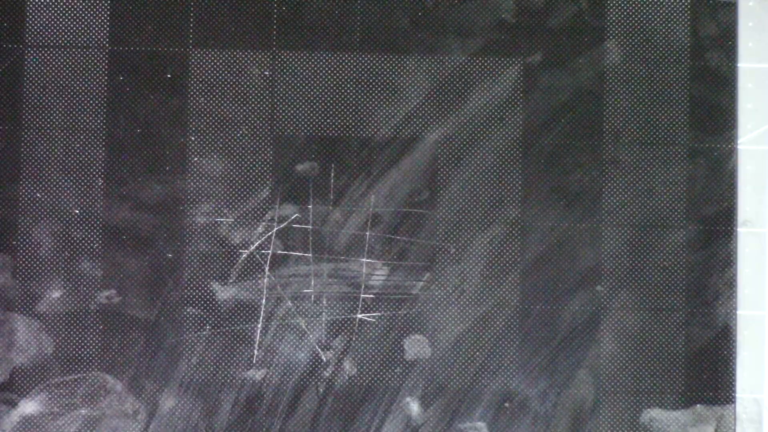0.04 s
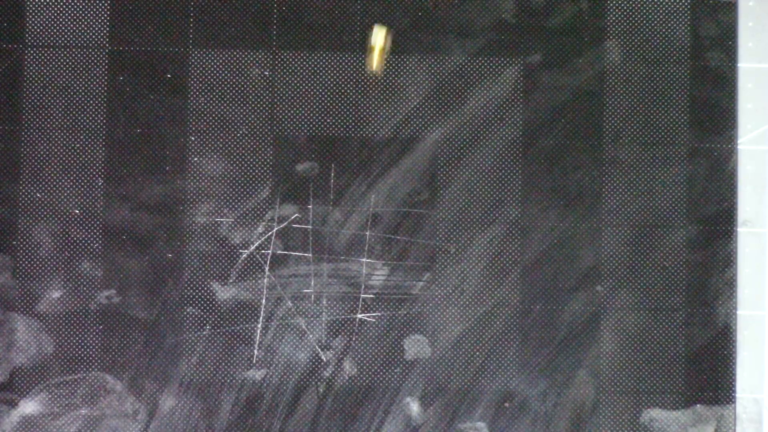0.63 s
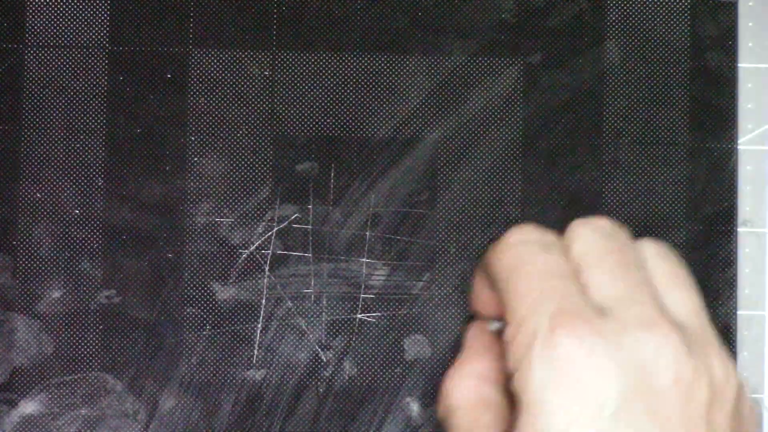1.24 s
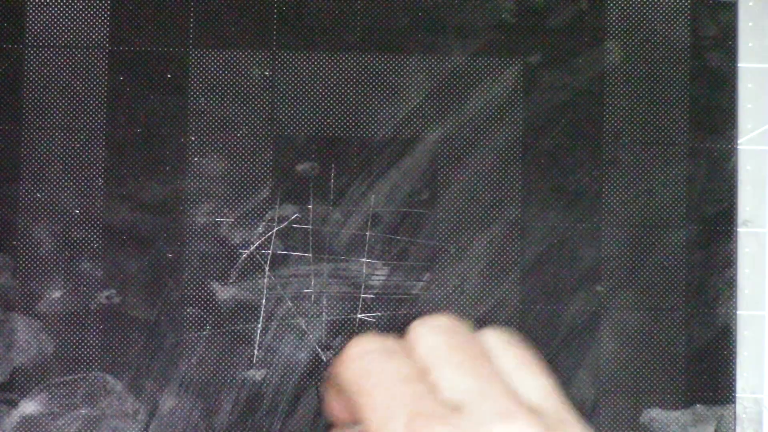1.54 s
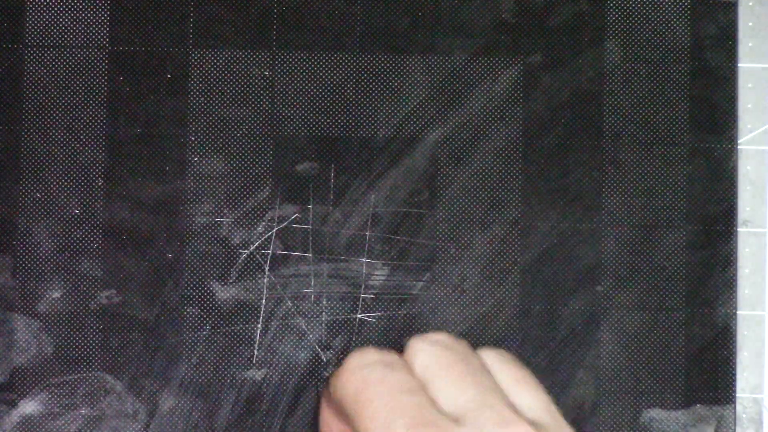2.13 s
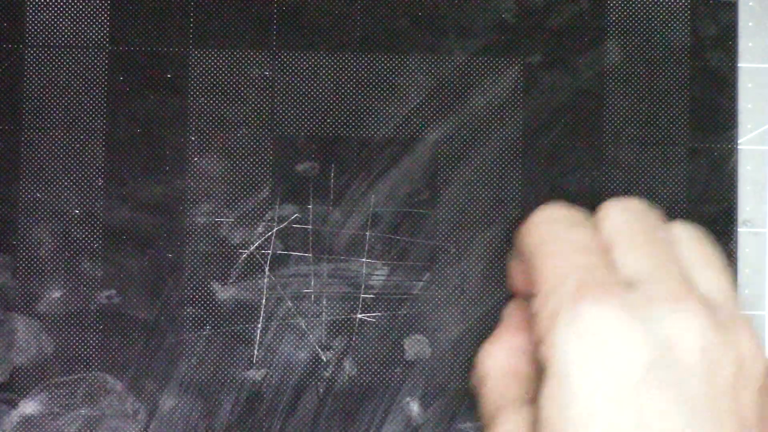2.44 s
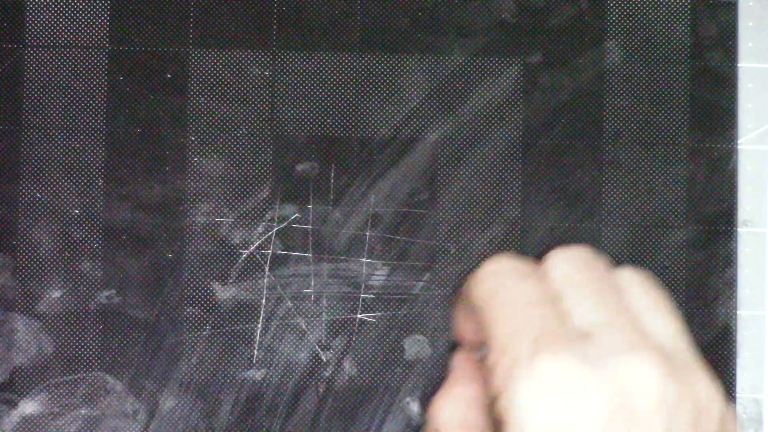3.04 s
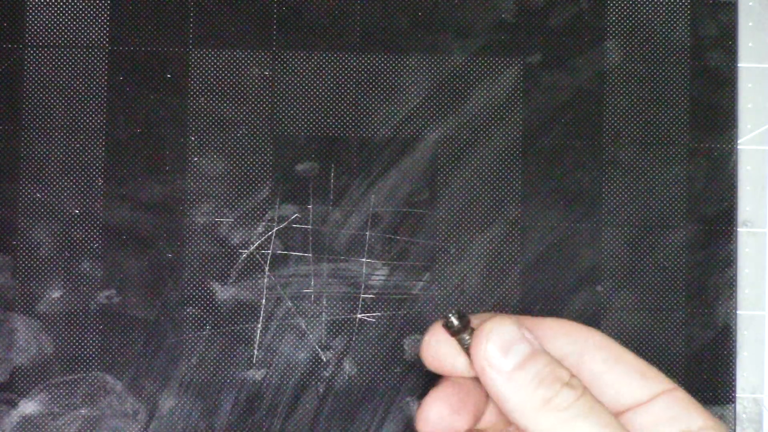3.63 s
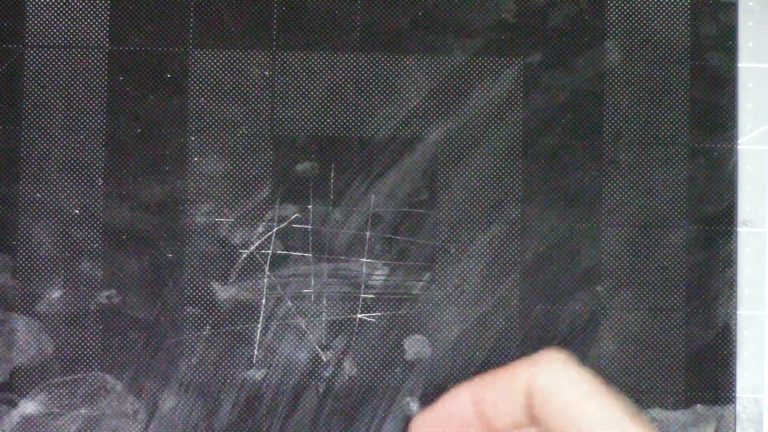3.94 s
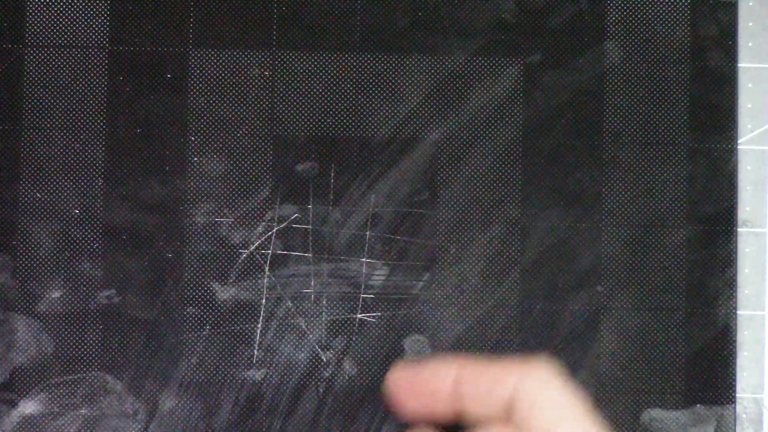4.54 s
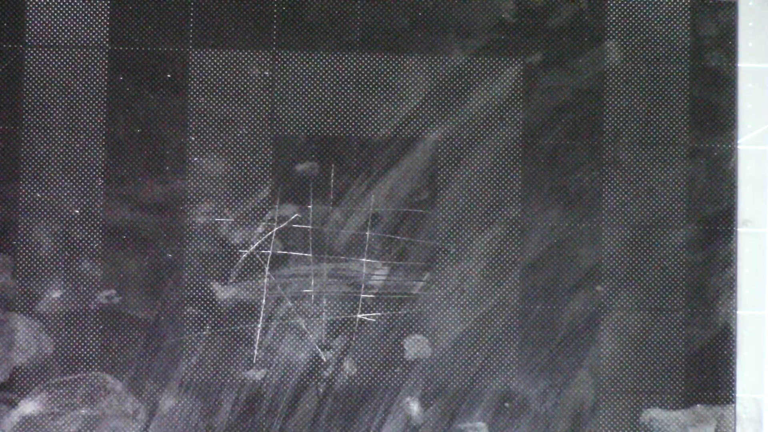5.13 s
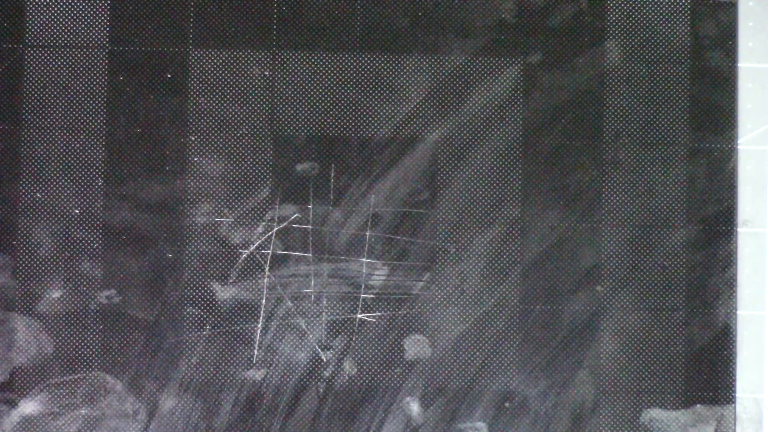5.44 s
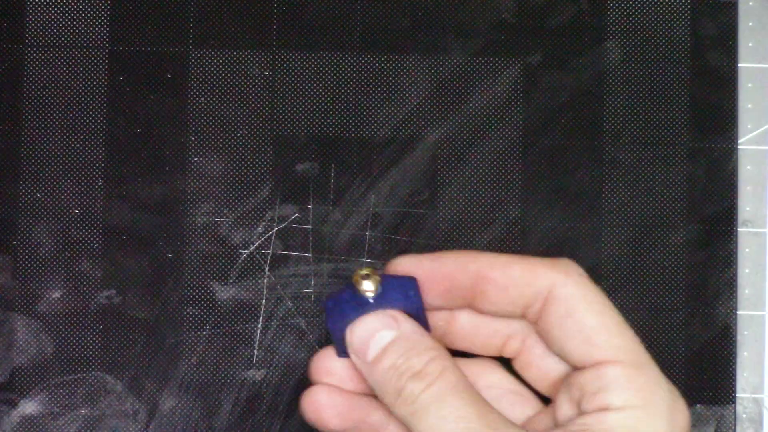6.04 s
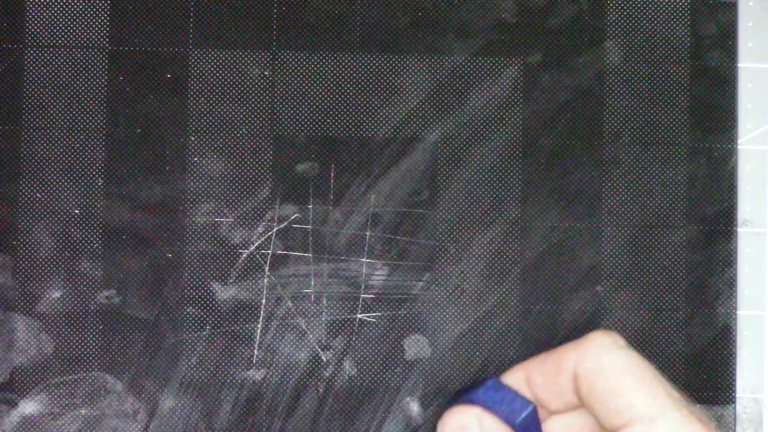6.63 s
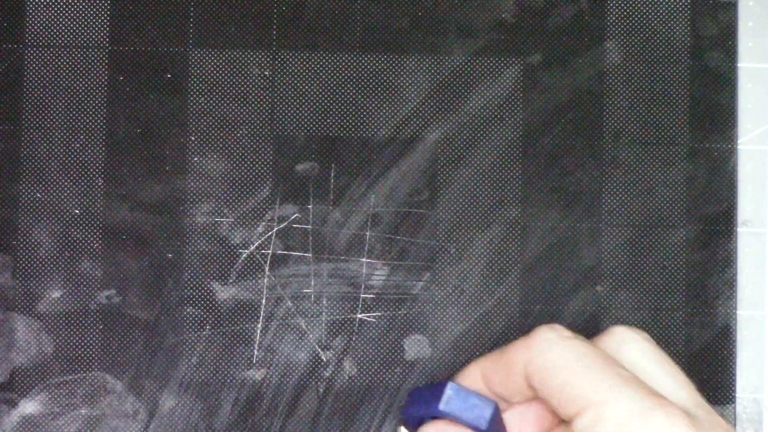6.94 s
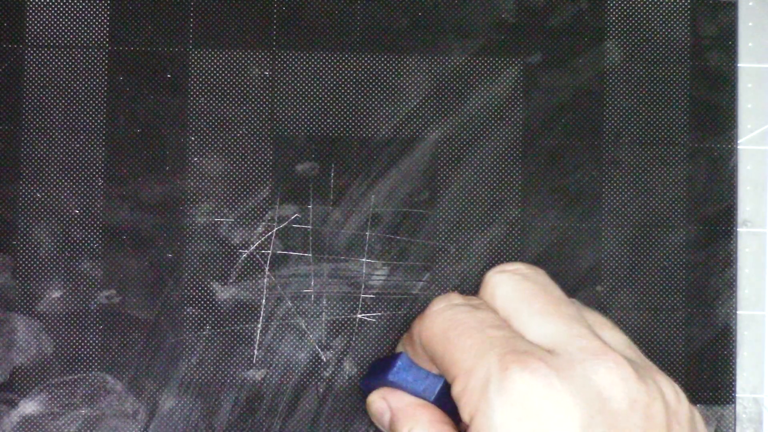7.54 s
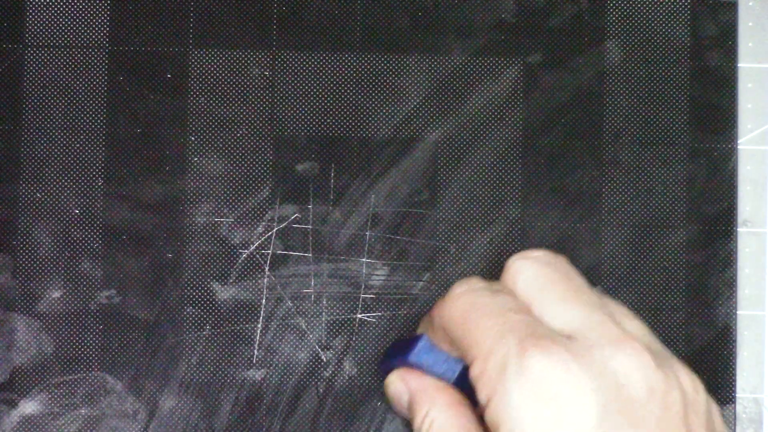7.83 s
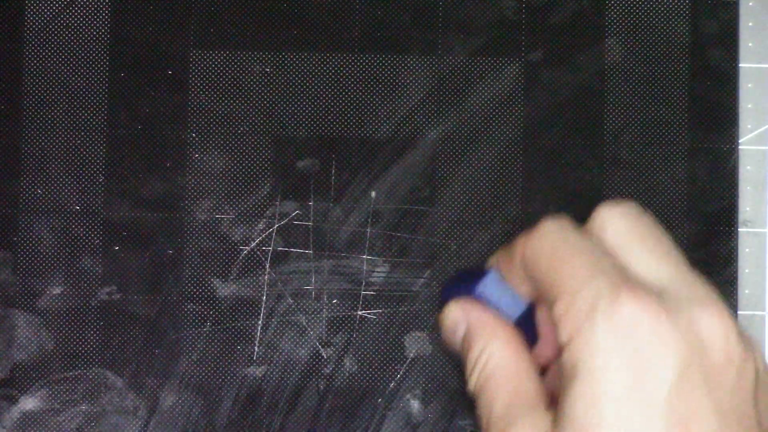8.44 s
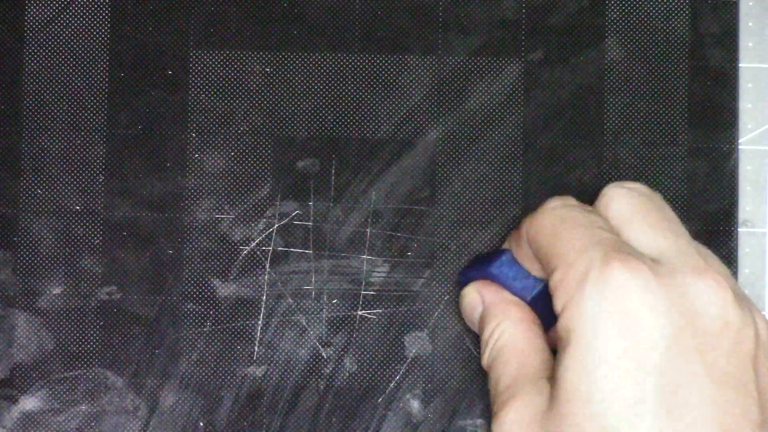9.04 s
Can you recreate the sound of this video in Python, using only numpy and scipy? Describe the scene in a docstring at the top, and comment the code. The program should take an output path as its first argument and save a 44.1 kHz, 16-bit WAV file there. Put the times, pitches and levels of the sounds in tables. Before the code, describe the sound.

A small metal nozzle bounces and rattles on a glass plate, then is stabbed down hard and scraped, with faint clicks in a quiet room.

```python
"""In a quiet room, printer nozzles are tried on a glass plate, close to a stereo microphone.
Twice a nozzle is dropped: each bounce makes the glass ring, and it rattles to rest. Five times one
is held, stabbed down hard and dragged, so that many tiny slips blur into a scrape; one stroke squeaks.
Hard blows overload the microphone. In between, small parts are picked up with faint clicks,
over a low rumble and hum."""
import sys
import numpy as np
from scipy import signal
from scipy.fft import rfft, irfft
from scipy.io import wavfile
from scipy.ndimage import uniform_filter1d

SR = 44100
rng = np.random.default_rng(int(sys.argv[2]) if len(sys.argv) > 2 else 0)


def materialize(psi):
    """Save the field psi as 16-bit PCM at rate SR to the path in sys.argv[1].

    A 1-D psi becomes a single channel; in a 2-D psi each row is a channel.
    """
    bounded = np.clip(np.atleast_2d(psi).T, -1, 1)
    quanta = np.round(bounded * 32767).astype(np.int16)
    wavfile.write(sys.argv[1], SR, quanta)


N = 409248
RING = np.arange(16384) / SR  # seconds through one blow
SLIDE = np.arange(1, 22051) / SR  # seconds through one scrape

# The nozzle is dropped, struck bare, struck in its holder, dragged lightly or pressed hard.
CONTACTS = ("loose", "bare", "block", "drag", "gouge")
# The glass plate's own tones, called modes. Each row: pitch in Hz, t60 (seconds to fade by 60 dB),
# left minus right in dB, then a level in dB for each of CONTACTS.
PLATE = [(182, 0.25, -3, -17, -21, -13, -6, -9), (525, 0.18, -4, -15, -22, -20, -13, -12),
         (600, 0.13, -5, -18, -20, -17, -5, -9), (785, 0.11, -2, -15, -17, -10, -4, -7),
         (900, 0.13, -1, -10, -23, -15, -4, -8), (1130, 0.1, -5, -14, -18, -12, -12, -15),
         (1470, 0.13, -3, -9, -15, -7, -11, -14), (1895, 0.15, -9, -6, -6, -2, 0, -3),
         (2047, 0.15, -3, -2, -5, 0, -9, -6), (2200, 0.1, 1, -5, -7, 0, -5, -4),
         (2455, 0.07, 0, -6, -5, -3, -11, -12), (2762, 0.11, 1, -1, 0, -4, -10, -5),
         (3040, 0.07, -1, -5, -10, -13, -18, -10), (3364, 0.17, -3, -3, -16, -10, -7, -2),
         (3635, 0.11, -6, -4, -7, -3, -15, -6), (3850, 0.06, -5, -10, -6, -10, -13, -11),
         (4215, 0.07, -4, -6, -7, -16, -15, -12), (4760, 0.08, -3, -6, -7, -12, -12, -13),
         (5072, 0.12, -5, -4, -14, -9, -8, -2), (6300, 0.08, -3, -9, -15, -20, -16, -8),
         (6850, 0.05, -2, -14, -11, -17, -20, -16), (7670, 0.11, -6, 0, -10, -12, -14, 0),
         (7860, 0.11, -1, -4, -10, -11, -16, -10), (8590, 0.07, 1, -8, -6, -19, -15, -4),
         (9175, 0.1, -5, -3, -15, -20, -18, -11), (9771, 0.11, 0, -4, -10, -21, -19, -11),
         (9969, 0.1, 2, -7, -9, -23, -20, -12), (10730, 0.09, -2, -5, -8, -17, -21, -12),
         (11195, 0.1, -3, -11, -17, -24, -20, -10), (11820, 0.09, -3, -9, -13, -22, -19, -13),
         (12393, 0.11, -1, -7, -17, -30, -25, -13), (13400, 0.09, 0, -13, -19, -31, -26, -13),
         (14392, 0.11, -5, -12, -17, -27, -31, -18)]
# A held nozzle striking or catching on the glass.
# Each row: start in seconds, level in dB, treble tilt in dB per octave, kind of contact.
STABS = [(0.9643, -23.5, -8, "block"), (0.9802, -27, -4, "drag"), (1.0004, -29, -3, "drag"),
         (1.0142, -27.5, -0.5, "drag"), (1.030, -37, -10.5, "drag"), (1.2924, -50, -0.5, "drag"),
         (1.5513, 0.5, 1.5, "bare"), (1.8146, -44, 2, "bare"), (2.2282, 1, 2, "bare"),
         (2.351, -43, 5, "bare"), (2.392, -36.5, 6, "bare"), (2.5027, -43, 1, "bare"),
         (2.631, -46.5, -9.5, "bare"), (2.9147, 1, 1, "bare"), (3.197, -33, 3.5, "bare"),
         (4.4592, -25, 11, "drag"), (4.513, -33, 0, "drag"), (4.5641, -29.5, 4, "drag"),
         (4.5842, -37.5, 4, "drag"), (7.1256, -39.5, -2, "block"), (7.1320, -34.5, -5, "block"),
         (7.1388, -26.5, -10, "block"), (7.351, -51, -6, "block"), (7.5723, -2.5, -3, "block"),
         (8.3827, -41.5, -1.5, "block"), (8.7460, -2, 1.5, "block"), (8.8536, -31.5, 7.5, "block"),
         (8.8990, -33, 2, "block"), (8.9060, -31, 2, "block")]


def glass(contact, crack_t60, ring_db, damping, valley_db, cluster_hz=130, spot_db=2,
          likeness=0.67, phase_spread=0.63):
    """One blow on the plate: a noisy crack, strongest near the main modes, which then ring on."""
    # The crack, a crowd of short-lived modes. Each row: frequency in Hz, level in dB.
    crack_colour = [(100, 0), (400, -6), (800, -2), (1400, 2.5), (2100, -0.5), (2900, 0), (4800, 2.5),
                    (7000, 2), (10000, -3), (13000, -0.5), (15500, -0.5), (18000, -13)]
    # How far the left microphone is ahead. Each row: frequency in Hz, phase in radians.
    left_lead = [(20, 0.3), (1500, -0.15), (2500, -0.67), (4500, -1.12), (8000, -2), (15000, -1.68)]
    f = bins(len(RING))
    hz, t60, pan_db, *levels = np.transpose(PLATE)
    # Each spot on the glass favours other modes.
    db = levels[CONTACTS.index(contact)] + spot_db * rng.standard_normal(len(hz))
    widths = cluster_hz * np.sqrt(hz / 3000)
    clusters = (amp(db) / (1 + ((f[:, None] - hz) / widths) ** 2)).max(1)
    valleys = amp(np.interp(f, hz, db) + valley_db)  # the floor between the modes
    crack_db = read(crack_colour, f) + 10 * np.log10(clusters ** 2 + valleys ** 2)
    crack = colour(burst(crack_t60, likeness), crack_db)
    left_gain = amp(np.interp(f, hz, pan_db) / 2) * np.exp(1j * read(left_lead, f))
    crack[0] = irfft(rfft(crack[0]) * left_gain)
    weights = amp(db) * np.exp(2j * np.pi * rng.random(len(hz))) / np.sqrt(t60 / t60.mean())
    lead = read(left_lead, hz) + phase_spread * rng.standard_normal(len(hz))
    sides = np.array([amp(pan_db / 2) * np.exp(1j * lead), amp(-pan_db / 2)])
    ring = (weights * sides @ modes(damping)).real
    fade = np.cos(np.pi / 2 * RING / RING[-1]) ** 2
    return (unit_attack(crack) + amp(ring_db) * ring) * fade


def modes(damping):
    """The plate's modes as fading tones; a damping of 2 makes them die twice as fast."""
    hz, t60 = np.transpose(PLATE)[:2]
    step = np.exp((2j * np.pi * hz - np.log(1000) * damping / t60) / SR)
    return np.cumprod(np.broadcast_to(step[:, None], (len(hz), len(RING))), axis=1)


def burst(t60, likeness):
    """Fading noise for a crowd of modes, about equally strong in every narrow band."""
    noise = pair(len(RING), likeness) * dying(t60)
    power = uniform_filter1d(abs(rfft(noise)) ** 2, size=40)
    return np.array([colour(side, -10 * np.log10(p / p.mean() + 1e-9)) for side, p in zip(noise, power)])


def bounces():
    """A dropped nozzle leaves the glass at once, so the plate rings freely."""
    # Each row is one bounce: start in seconds, level in dB, treble tilt in dB per octave.
    landings = [(0.363, 1, 2.5), (0.3708, -11, 2), (0.3982, -8, 2), (0.4236, -5.5, 1.5),
                (0.4476, -5.5, -2.5), (0.475, -8.5, -3.5), (0.4956, -5, 0), (0.513, -13, -1),
                (0.5448, -14, -4), (0.5617, -17, -4), (0.5902, -8.5, 0.5), (0.603, -16.5, -4),
                (0.6479, -6, -1), (0.6878, -13.5, -6), (0.7139, -12, -1), (0.7301, -13.5, -0.5),
                (0.7495, -14.5, -1.5), (0.8386, -39, -11), (0.8745, -26, -5), (0.9026, -22, -13),
                (0.9095, -23, -8), (4.2782, 3, 2.5), (4.3048, -0.5, 2.5), (4.3324, -6.5, -1.5),
                (4.3596, -3.5, -1), (4.3668, -3.5, 8.5), (4.386, -16.5, -2), (4.4, -19, 2),
                (4.4079, -3.5, -0.5), (4.4296, -14, 3.5)]
    out = np.zeros((2, N))
    for s, db, tilt_db in landings:
        blow = glass("loose", crack_t60=0.0235, ring_db=-15.5, damping=1.15, valley_db=-14.0,
                     cluster_hz=95, spot_db=2.6)
        add(out, s, amp(db) * unit_attack(tilted(blow, tilt_db)))
    return out * amp([[-.5], [.5]])


def stabs():
    """A held nozzle stays on the glass and chokes the ring."""
    # For each contact: level of the ring against the crack in dB, damping factor.
    choke = {"bare": (-15.5, 2.1), "block": (-15.5, 1.55), "drag": (-14.5, 1.9)}
    out = np.zeros((2, N))
    for s, db, tilt_db, contact in STABS:
        ring_db, damping = choke[contact]
        blow = glass(contact, crack_t60=0.0185, ring_db=ring_db, damping=damping, valley_db=-12,
                     cluster_hz=120, spot_db=1.5)
        add(out, s, amp(db) * unit_attack(tilted(blow, tilt_db)))
    return out * amp([[-.5], [.5]])


def friction(strokes, contact, slips_per_s, uneven_db, ring_db, bed_db, damping, valley_db):
    """Tiny slips of the tip ring the plate; each stroke sets how deep and how bright they sound."""
    out, size = np.zeros((2, N)), len(SLIDE)
    bands_hz = [(1500, 5500), (300, 1500), (5500, 15500), (90, 260)]  # middle, low, treble, bed
    spots = [glass(contact, crack_t60=0.027, ring_db=ring_db, damping=damping, valley_db=valley_db)
             for _ in range(6)]
    for start, middle, low, treble in strokes:
        scrape = 0
        for spot in spots:
            slipping = rng.random(size) < slips_per_s / len(spots) / SR
            strength = amp(uneven_db * np.minimum(rng.exponential(1, size), 3))
            slips = slipping * strength * rng.choice([-1, 1], size)
            scrape = scrape + signal.fftconvolve(slips[None], spot, axes=1)[:, :size]
        for band, db in zip(bands_hz, (middle, middle + low, middle + treble, middle + low + bed_db)):
            part = signal.sosfilt(signal.butter(3, band, "band", fs=SR, output="sos"), scrape)
            add(out, start, evened(part) * amp(db))
    return out


def stroke(length, db, sag_db_per_s, rise_s, release_db_per_s, touch_db=-25):
    """Level in dB of one slide: it rises from a light touch, drifts steadily, then is let go."""
    attack_db = touch_db * np.maximum(1 - SLIDE / rise_s, 0) ** 2
    sag_db = sag_db_per_s * np.minimum(SLIDE, length)
    release_db = release_db_per_s * np.maximum(SLIDE - length, 0)
    return db + attack_db - sag_db - release_db


def rolls():
    """The loose nozzle rolls and skids with an even tone until it runs down."""
    # Each row is one skid: start and length in seconds, middle band level in dB,
    # fall in dB per second, then low band and treble in dB against the middle.
    skids = [(0.69, .09, -21.5, 35, -10.5, -3), (0.871, .042, -31, 0, -9, -7),
             (0.935, 0.084, -44, 50, 1, -5), (4.44, .085, -38.5, 126.5, 1, -1)]
    strokes = [(start, stroke(length, db, sag, rise_s=0.0054, release_db_per_s=330), low, treble)
               for start, length, db, sag, low, treble in skids]
    return friction(strokes, "drag", slips_per_s=770, uneven_db=3, ring_db=-15.5, bed_db=-16,
                    damping=3, valley_db=-7)


def drags_and_ring(pull_after_s=.19, pull_width_s=0.046):
    """Four easing drags with one pull each; at 7.145 s, a brief dull ring after the holder touches."""
    # Each row: start and length in seconds, middle band level in dB,
    # fall in dB per second, then low band and treble in dB against the middle.
    after_landing = [(1.56, 0.29, -45.5, 20, -6, -5), (2.24, 0.33, -41.5, 60, -5, -4.5),
                     (2.925, 0.25, -41.5, 36, -7, -5), (7.145, .07, -46, 270, -1.5, -17),
                     (8.76, .30, -48, 12, -10.5, -2.5)]
    pull = np.exp(-((SLIDE - pull_after_s) / pull_width_s) ** 2)
    strokes = []
    for start, length, db, sag, low, treble in after_landing:
        level = stroke(length, db, sag, rise_s=.01, release_db_per_s=399.5)
        # The hand's pull makes the scrape louder and deeper.
        strokes.append((start, level + 5.5 * pull, low + 5 * pull, treble - 3.5 * pull))
    return friction(strokes, "drag", slips_per_s=1300, uneven_db=4.5, ring_db=-12, bed_db=-8,
                    damping=3.4, valley_db=-9)


def gouge(stop_s=0.081, thins_db=7, brightens_db=13):
    """The tip digs in and speeds up, sounding thinner and brighter as it goes, then stops."""
    # One long stroke: start and length in seconds, middle band level in dB,
    # fall in dB per second (negative, so it grows), low band and treble in dB against the middle.
    hard_stroke = (7.80, .305, -39, -6, -4, -7)
    start, length, db, sag, low, treble = hard_stroke
    speed = np.interp(SLIDE, [0, length, length + stop_s], [0, 1, 0])
    level = stroke(length, db, sag, rise_s=.08, release_db_per_s=280)
    strokes = [(start, level, low - thins_db * speed, treble + brightens_db * speed)]
    return friction(strokes, "gouge", slips_per_s=1500, uneven_db=3, ring_db=-8, bed_db=-5,
                    damping=3.7, valley_db=-4.5)


def squeak(start=8.085, length=0.055, hz=3382, db=-36, waver=0.0077):
    """At the end of the hard stroke the slips briefly lock on to one mode of the plate."""
    out, size = np.zeros((2, N)), round(length * SR)
    pitch = hz * (1 + waver * evened(uniform_filter1d(rng.standard_normal(size), size=200)))
    tone = np.sin(2 * np.pi * np.cumsum(pitch) / SR)
    add(out, start, amp(db) * tone * np.hanning(size) * amp([[-1], [1]]))
    return out


def thuds(jolt_db=-38):
    """The bed under the glass bobs on its mounts, moved by the hand and jolted by every stab."""
    # The hand settling on the bed or letting go. Each row: start in seconds, level in dB.
    touches = [(1.923, -46.5), (2.529, -48), (3.211, -46), (7.131, -38), (8.38, -36), (9.103, -41)]
    # Each row: pitch in Hz, t60 in seconds, level in dB.
    bed_modes = ((182, .3, 0), (122, .15, -8), (240, .1, -10), (100, .25, -10))
    bob = sum(amp(db) * dying(t60) * np.sin(2 * np.pi * hz * RING) for hz, t60, db in bed_modes)
    jolts = [(s, db + jolt_db) for s, db, *_ in STABS]
    out = np.zeros((2, N))
    for s, db in touches + jolts:
        add(out, s, amp(db) * bob * amp([[-1], [1]]))
    return out


def click(t60, tilt_db):
    """A light contact makes a brief burst of noise."""
    # The burst's tone. Each row: frequency in Hz, level in dB.
    click_colour = [(100, -7), (500, -1.5), (2000, 2), (3500, -3), (6000, -2), (12000, -2.5), (16000, -10)]
    noise = pair(len(RING), likeness=0.16) * dying(t60)
    return unit_attack(tilted(colour(noise, read(click_colour, bins(len(RING)))), tilt_db))


def small_sounds(middling_db=-46, room_share=.5):
    """Clicks, knocks and one short hiss: the direct sound, and what they send into the room."""
    # Clicks of small parts, and at 0.942 s a short bright hiss as the nozzle rolls.
    # Each row: start in seconds, level in dB, treble tilt in dB per octave.
    clicks_and_hiss = [(0.029, -45, -1.5), (0.191, -52, 3), (0.23, -46.5, -2), (0.942, -38, 4),
                       (1.107, -50, -11), (3.416, -52.5, -3), (3.675, -57, -1.5), (4.08, -41, 5),
                       (4.144, -49, -1), (4.648, -50, 5), (4.821, -43.5, 3), (5.204, -49.5, -2.5),
                       (5.2212, -37.5, 7.5), (5.320, -47.5, -2.5), (5.56, -41, -2.5), (5.892, -52, 0),
                       (6.111, -53, -6.5), (6.2522, -46.5, 0), (6.548, -48, -6), (6.633, -45, -2.5),
                       (6.823, -51, -9.5)]
    # Dull knocks of a plastic part. Each row: start in seconds, level in dB.
    knock_times = [(5.3588, -18.5), (5.3641, -24.5)]
    # The knock's tone. Each row: frequency in Hz, level in dB.
    knock_colour = [(100, -3.5), (500, -7.5), (900, 3.5), (1300, -0.5), (2000, 1), (2800, -9.5),
                    (3600, -21.5), (5300, -9), (7000, -40), (16000, -36)]
    light, knocks, to_room = np.zeros((3, 2, N))
    for s, db, tilt_db in clicks_and_hiss:
        sound = click(t60=.06, tilt_db=tilt_db)
        add(light, s, amp(db) * sound)
        # Louder ones are nearer, so less of their sound is echo.
        add(to_room, s, amp(middling_db + room_share * (db - middling_db)) * sound)
    for s, db in knock_times:
        knock = unit_attack(colour(burst(t60=0.044, likeness=0.8), read(knock_colour, bins(len(RING)))))
        snap = amp(-7) * click(t60=0.0073, tilt_db=5)
        add(knocks, s, amp(db) * (knock + snap))
    return light + knocks, to_room + amp(-23) * knocks


def room(x, onset_s=0.0072):
    """The room's echo builds up quickly, and each band dies at its own speed."""
    # Each row: frequency in Hz, t60 of the echo in seconds.
    fade_times = [(100, .35), (500, 0.96), (2000, 0.2), (6000, 0.23), (15000, 0.058)]
    hz, t, spectrum = signal.stft(rng.standard_normal((2, SR // 2)), SR, nperseg=256)
    decay = np.exp(-np.log(1000) * t / read(fade_times, hz)[:, None])
    tail = signal.istft(spectrum * decay, SR, nperseg=256)[1]
    tail *= 1 - np.exp(-(np.arange(tail.shape[1]) / SR / onset_s) ** 2)
    return signal.fftconvolve(x, tail / np.linalg.norm(tail[0]), axes=1)[:, :N]


def air(db=-54.5):
    """A steady hush of room air, most alike at the two microphones in the bass."""
    # The air's tone. Each row: frequency in Hz, relative level in dB.
    air_colour = [(35, -23), (60, 8.5), (87, -19.5), (108, -0.5), (202, -8.5), (233, -3), (308, -9.5),
                  (1220, -17), (1470, -26), (1860, -25), (2300, -29.5), (3120, -27), (3940, -33),
                  (16000, -34)]
    f = bins(N)
    shared = read([(100, 1.0), (1000, 0.76), (4000, 0.89), (12000, 0.33)], f)
    left, other = rfft(rng.standard_normal((2, N)))
    right = shared * left + np.sqrt(1 - shared ** 2) * other
    return amp(db) * evened(irfft(np.array([left, right]) * amp(read(air_colour, f)), N))


def rumble(level_db=-38, wander_db=1.5):
    """A deep rumble whose level wanders and swells three times."""
    # The rumble's tone. Each row: frequency in Hz, relative level in dB.
    rumble_colour = [(2, -3.5), (8, 1), (15, -5), (27, -10), (40, -24), (70, -35), (150, -70.5),
                     (400, -100)]
    # Each row is one swell: peak time in seconds, half width in seconds, rise in dB.
    swells = [(0.25, .18, 10), (1.15, .15, 5), (4.85, .28, 10)]
    f, t = bins(N), np.arange(N) / SR
    wander = evened(irfft(rfft(rng.standard_normal(N)) * (f < 2), N))
    swell_db = sum(db * np.exp(-((t - s) / width) ** 2) for s, width, db in swells)
    noise = evened(irfft(rfft(pair(N, likeness=1.0)) * amp(read(rumble_colour, f)), N))
    return noise * amp(level_db + wander_db * wander + swell_db)


def hum():
    """The mains supply hums with three steady low tones."""
    # Each row: pitch in Hz, level in dB.
    tones = [(59.5, -67), (119.6, -66.5), (179, -67.5)]
    t = np.arange(N) / SR
    return sum(np.sqrt(2) * amp(db) * np.sin(2 * np.pi * (hz * t + rng.random())) for hz, db in tones)


def amp(db):
    """Turns decibels into a gain."""
    return 10 ** (np.asarray(db) / 20)


def evened(x):
    """Scales a sound to an average (rms) level of 1."""
    return x / np.sqrt(np.mean(x ** 2) + 1e-20)


def unit_attack(x):
    """Scales a blow so that its first 4 milliseconds have an rms level of 1."""
    return x / np.sqrt(np.mean(x[:, :SR // 250] ** 2))


def read(points, hz):
    """Reads between the rows of a table on a logarithmic frequency axis."""
    f, value = np.transpose(points)
    return np.interp(np.log(hz + 1), np.log(f + 1), value)


def add(mix, s, sound):
    """Adds a stereo sound to the mix at s seconds."""
    part = mix[:, max(round(s * SR), 0):][:, :sound.shape[1]]
    part += sound[:, :part.shape[1]]


def dying(t60):
    """A fade that loses 60 dB every t60 seconds."""
    return np.exp(-np.log(1000) * RING / t60)


def bins(size):
    """Frequencies in the spectrum of this many samples."""
    return np.fft.rfftfreq(size, 1 / SR)


def colour(x, db):
    """Filters by a gain in dB at each frequency, so that nothing sounds before the blow."""
    log_gain = np.log(amp(np.r_[db, db[-2:0:-1]]))
    response = np.exp(np.conj(signal.hilbert(log_gain)))[:len(db)]
    return irfft(rfft(x) * response)


def tilted(x, tilt_db, corner_hz=2500):
    """Tilts the treble by tilt_db per octave above the corner; a softer contact loses treble."""
    return colour(x, tilt_db * np.log2(1 + (bins(len(RING)) / corner_hz) ** 2) / 2)


def pair(size, likeness):
    """White noise at two microphones, from unrelated (likeness 0) to identical (1)."""
    left, other = rng.standard_normal((2, size))
    return np.array([left, likeness * left + np.sqrt(1 - likeness ** 2) * other])


def scene():
    """Everything on the plate, the small sounds around it, and the room."""
    scrapes = rolls() + drags_and_ring() + gouge()
    plate = bounces() + stabs() + thuds() + scrapes + squeak()
    direct, to_room = small_sounds()
    echo = room(amp(-28) * plate + to_room)
    background = (air() + rumble() + hum()) * amp([[-1.3], [1.2]])
    return plate + direct + echo + background


def record(dry, ceiling=1.02, edge_hz=16000):
    """The microphone overloads, flattening loud peaks; then the highest treble is cut."""
    clipped = dry / (1 + (dry / ceiling) ** 12) ** (1 / 12)
    treble_cut = signal.firwin(127, edge_hz, window=("kaiser", 4), fs=SR)
    return signal.oaconvolve(clipped, treble_cut[None], "same")


dry = scene()
out = record(dry)
materialize(out)
```